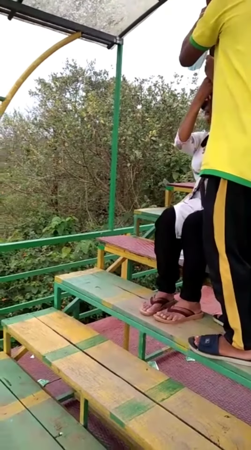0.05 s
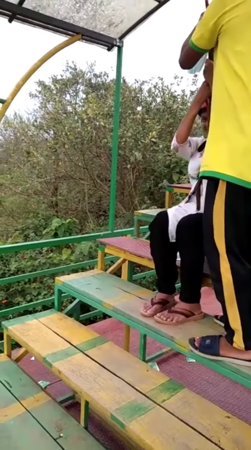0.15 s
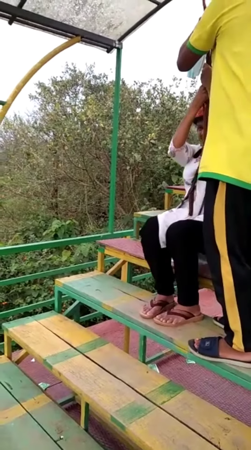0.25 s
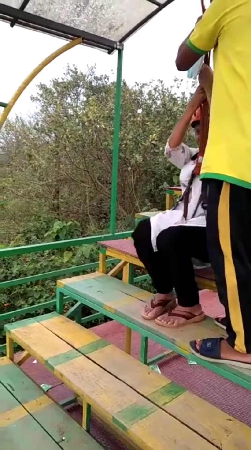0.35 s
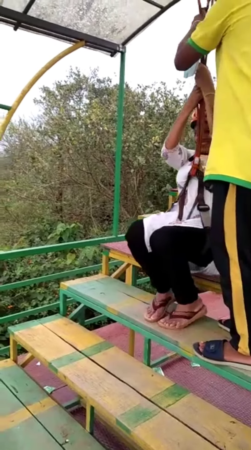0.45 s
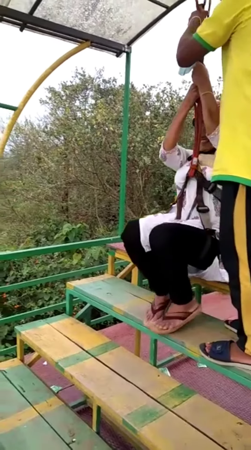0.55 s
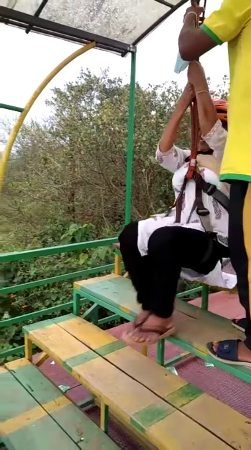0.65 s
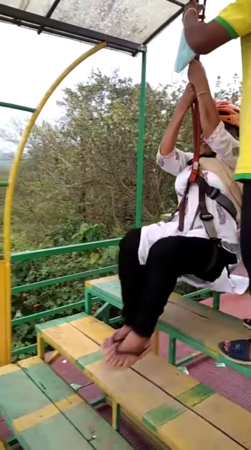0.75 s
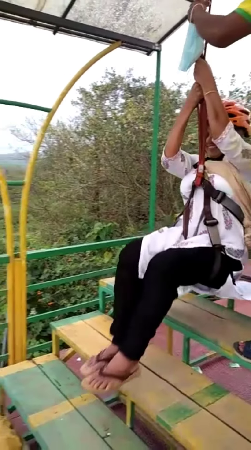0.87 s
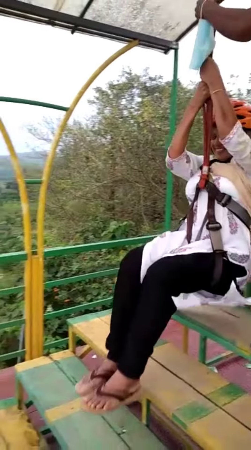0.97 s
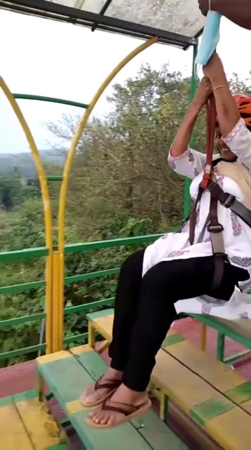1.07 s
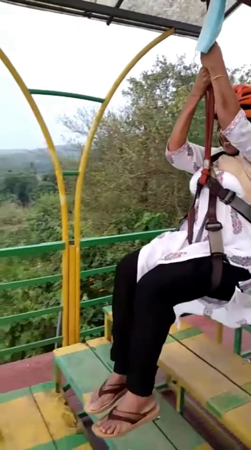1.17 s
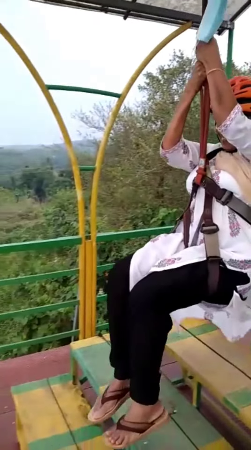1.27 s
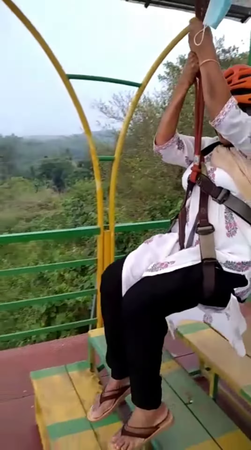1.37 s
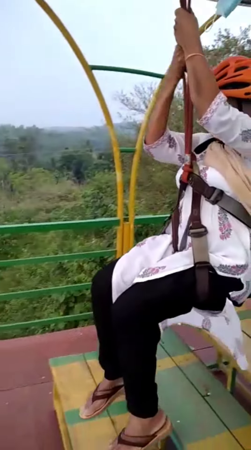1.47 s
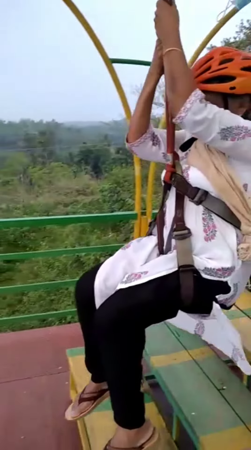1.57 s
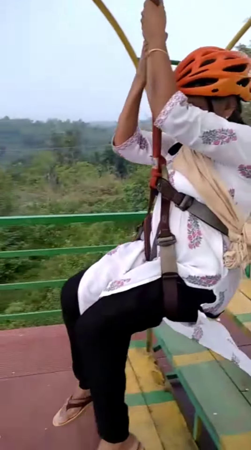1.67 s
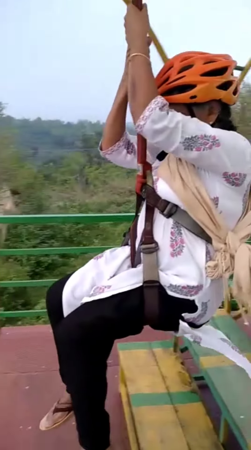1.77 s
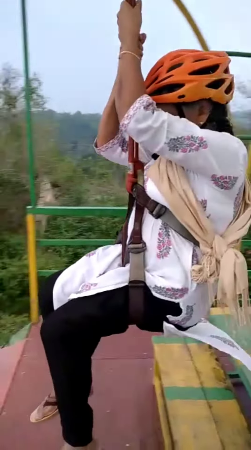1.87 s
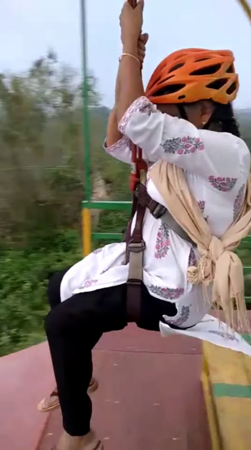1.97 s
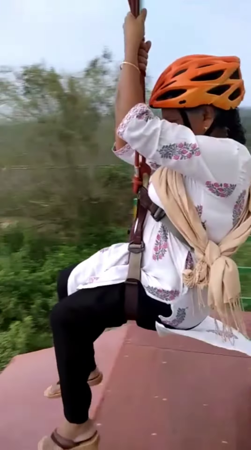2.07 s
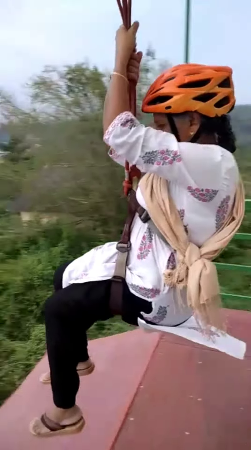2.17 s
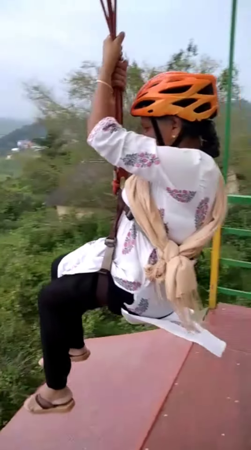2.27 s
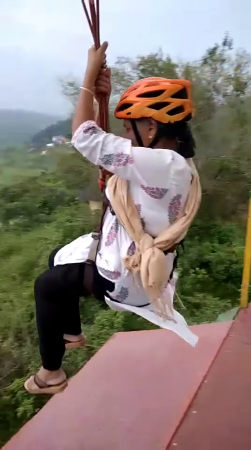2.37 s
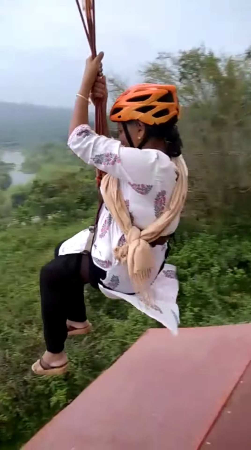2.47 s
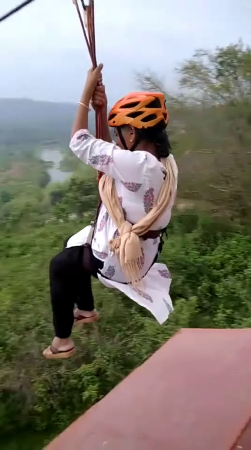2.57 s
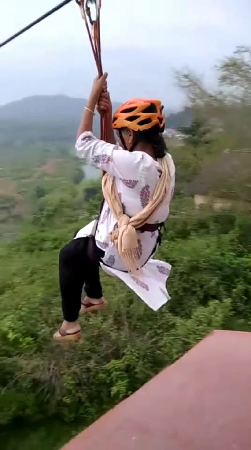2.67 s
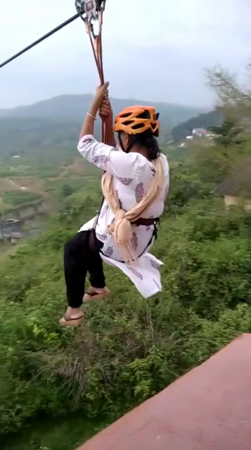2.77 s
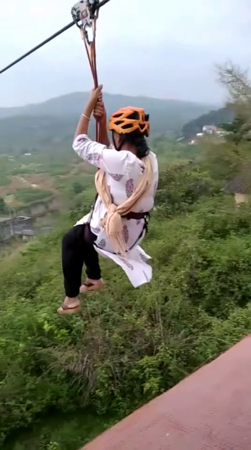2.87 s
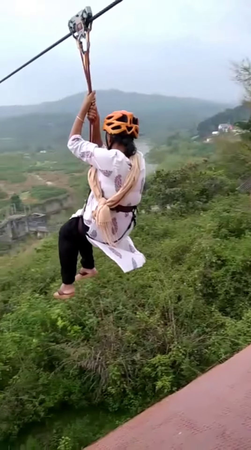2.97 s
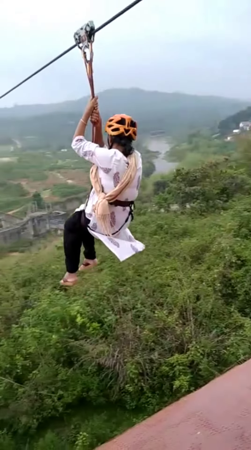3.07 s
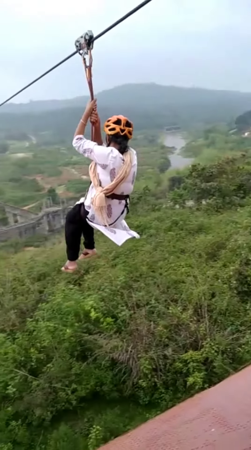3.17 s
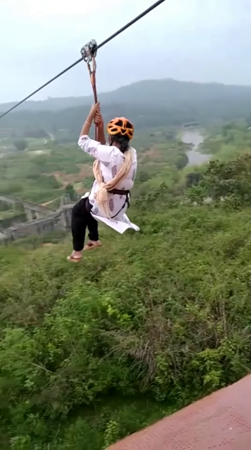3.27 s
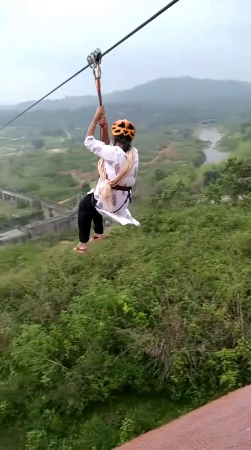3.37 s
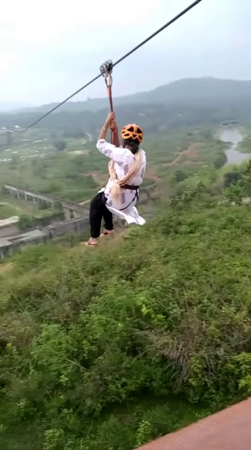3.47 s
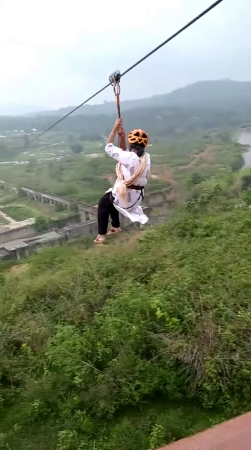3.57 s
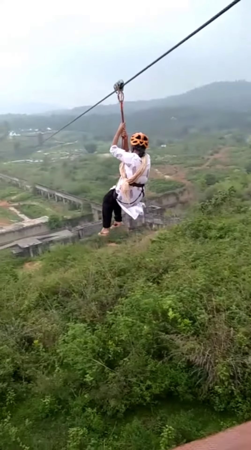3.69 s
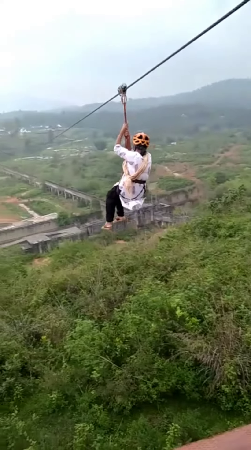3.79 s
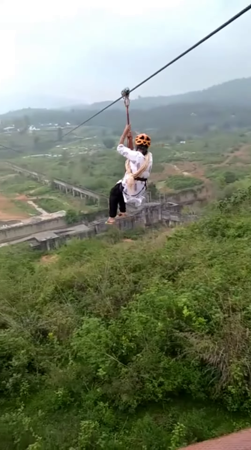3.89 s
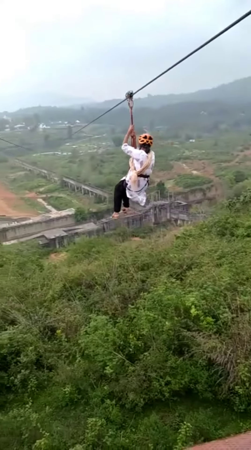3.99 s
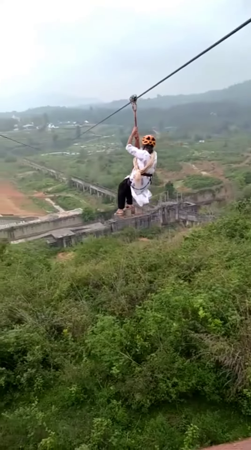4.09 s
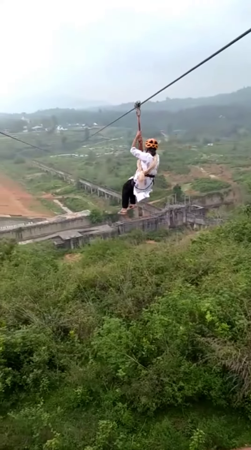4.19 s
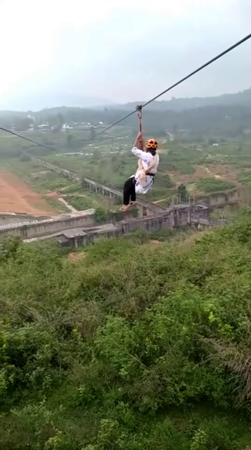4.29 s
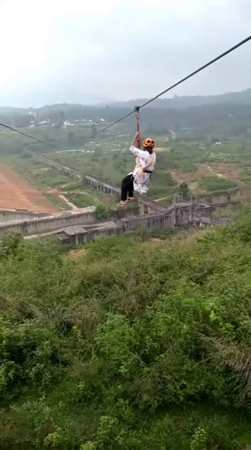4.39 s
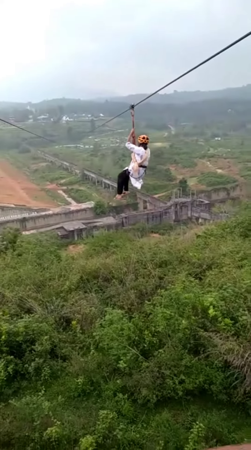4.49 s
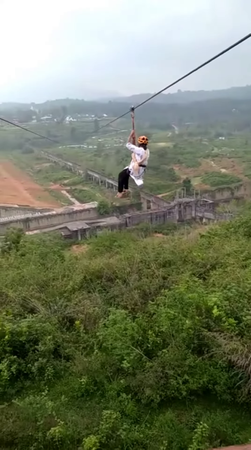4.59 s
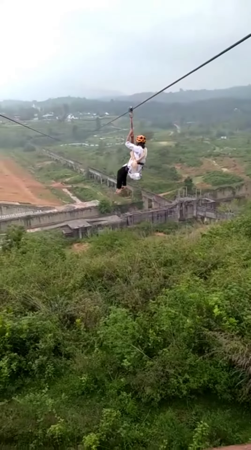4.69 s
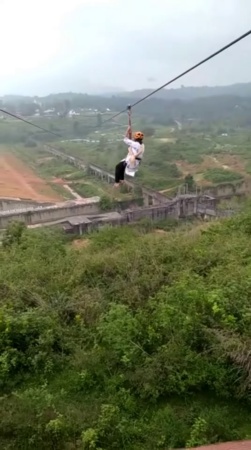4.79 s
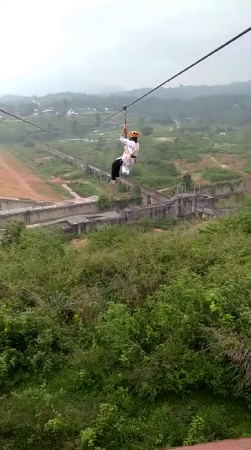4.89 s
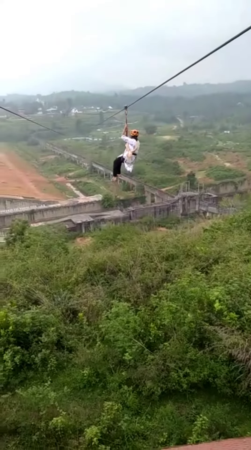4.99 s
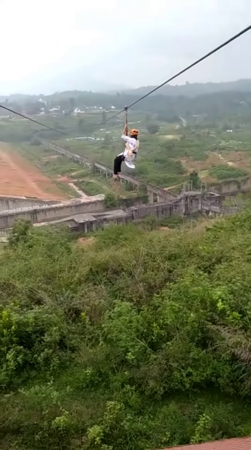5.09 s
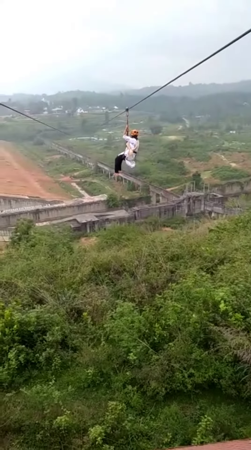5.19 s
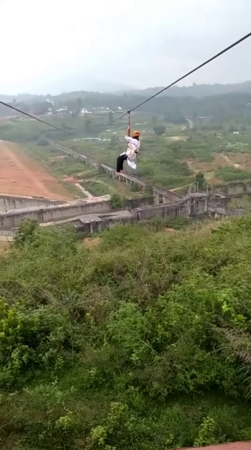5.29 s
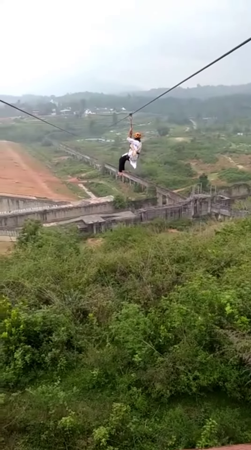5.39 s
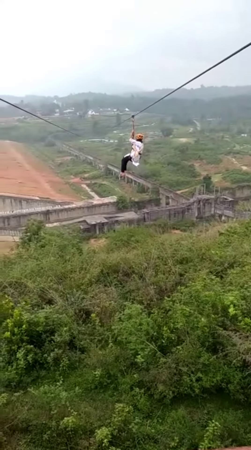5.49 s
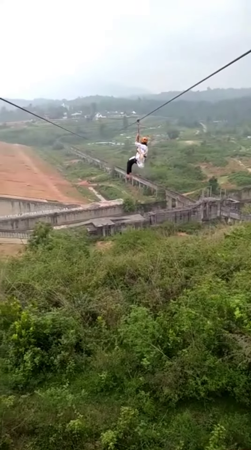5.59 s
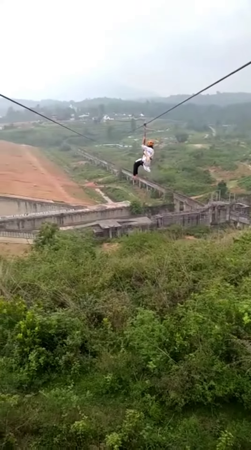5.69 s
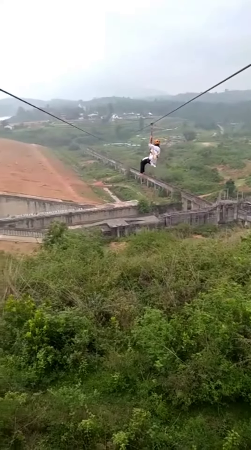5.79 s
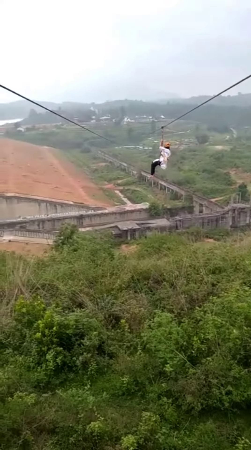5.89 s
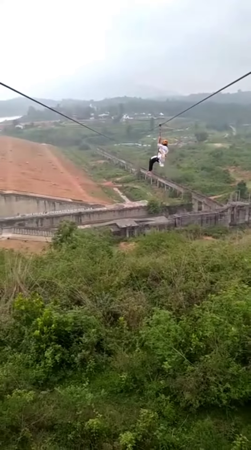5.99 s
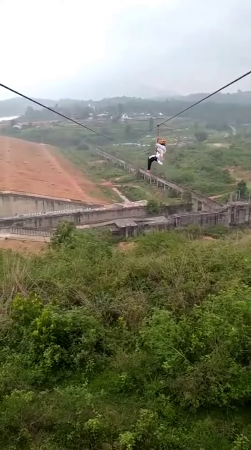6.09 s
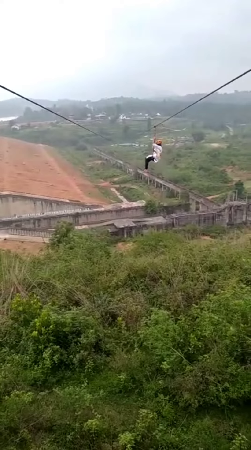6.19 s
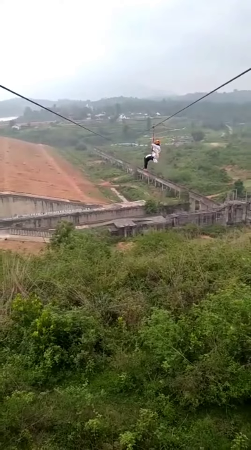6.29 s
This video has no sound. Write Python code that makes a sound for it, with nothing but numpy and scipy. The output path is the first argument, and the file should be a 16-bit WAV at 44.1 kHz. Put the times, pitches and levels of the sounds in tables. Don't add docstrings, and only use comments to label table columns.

```python
import sys
import numpy as np
from scipy import signal
from scipy.fft import rfft, irfft, next_fast_len
from scipy.io import wavfile
from scipy.ndimage import uniform_filter1d, map_coordinates

SR = 44100
rng = np.random.default_rng(int(sys.argv[2]) if len(sys.argv) > 2 else 0)


def wav_record(signal):
    frames = np.transpose(np.atleast_2d(signal))
    bounded = np.clip(frames, -1, 1)
    quanta = np.round(bounded * 32767).astype(np.int16)
    wavfile.write(sys.argv[1], SR, quanta)


def makeup_ratio(level_db):
    decades = np.asarray(level_db, float) / 20
    return 10 ** decades


N = 279831

# time_s, level_db
CONTACT_FORCE = [(0.36, -95), (0.45, -71), (0.5, -65), (0.59, -57.5), (0.75, -57.5), (0.9, -61),
                 (1.04, -49.5), (1.21, -43.5), (1.49, -44), (1.85, -43), (1.9, -46), (1.97, -41.5),
                 (2.05, -41), (2.37, -42), (2.43, -39.5), (2.5, -39.5), (2.91, -40.5), (3.9, -39),
                 (4.34, -38.5), (4.7, -39), (4.94, -40), (5.21, -39), (5.76, -40.5), (6.35, -39.5)]
# time_s, rate_per_s, throbbing_share (0-1), share_through_cable (0-1)
STRAND_PASSING = [
    (0.4, 50, 0.5, 0.5),
    (1.1, 102, 0.47, 0.3),
    (1.16, 108, 0.32, 0.38),
    (2.0, 78, 0.22, 0.02),
    (2.7, 172, 0, 0.83),
    (3.5, 120, 0.03, 0.99),
    (4.6, 150, 0.1, 0.95),
    (6.35, 140, 0, 0.95),
]
# time_s, peak_db
STRAND_TICKS = [(0.3703, -56), (0.388, -34), (0.4257, -39.5), (0.4565, -28), (0.463, -36), (0.4796, -25.5),
                (0.5023, -31), (0.521, -23), (0.5432, -24), (0.551, -28.5), (0.561, -33), (0.579, -29),
                (0.5935, -21.5), (0.612, -31), (0.6263, -25), (0.645, -43), (0.6577, -21.5), (0.6744, -27),
                (0.6894, -28), (0.7044, -23), (0.7184, -25), (0.734, -28), (0.747, -28), (0.762, -26),
                (0.7751, -22.5), (0.7894, -22), (0.802, -22), (0.818, -21.5), (0.824, -24), (0.8317, -32),
                (0.838, -20), (0.849, -28), (0.864, -29), (0.880, -26), (0.8963, -30), (0.9146, -25),
                (0.933, -27), (0.9527, -28), (0.9595, -23), (0.969, -24), (0.9844, -23), (0.999, -27),
                (1.014, -23.5), (1.0281, -23), (1.0403, -29), (1.0524, -17.5), (1.065, -21), (1.0767, -14),
                (1.0894, -17), (1.1, -20), (1.115, -21), (1.128, -28), (1.1887, -19)]
# time_s, peak_db, brightness_db
ROUGH_SPOTS = [(1.3552, -33, 3.5), (1.4071, -43, -3), (1.469, -25, -1.5), (1.6067, -34, 7.5),
               (1.709, -39, 3), (1.7633, -32, 4), (1.8845, -32, 2), (2.0555, -38, 0), (2.112, -43, -3),
               (2.1858, -39, -2), (2.212, -33, 0), (2.2816, -25, -1.5), (2.33, -26, 3), (2.36, -27, 1),
               (2.4961, -35.5, 11.5), (2.5495, -14.5, -8.5), (2.5994, -25, 3.5), (2.6425, -23, -0.5),
               (2.7096, -30, 0), (2.7835, -40, -2), (2.8559, -19, -3), (2.9682, -16, -8), (3.2894, -14, -9),
               (3.3287, -20.5, -8), (3.5562, -24, 0.5), (3.6294, -19, -8), (3.65, -38, -9),
               (3.9772, -24.5, 1), (4.2012, -34, 0), (4.2394, -12.5, -9.5), (4.39, -30, -6), (4.6, -30, -4),
               (4.715, -21, -4.5), (4.83, -33, -6), (4.894, -20, -9), (5.083, -17, -2.5), (5.1696, -14, -8),
               (5.185, -22, -4), (5.1974, -28, -8), (5.2713, -26, -2), (5.3494, -16.5, -7),
               (5.466, -19.5, -0.5), (5.5194, -15, -10), (5.72, -14.5, -10), (5.925, -19.5, -0.5),
               (5.9492, -17, -8), (6.0294, -27.5, 5.5), (6.062, -26, 2), (6.328, -26, -4)]
# time_s, level_db
PLATE_PRESSURE = [(0.7, -3), (1.0, -2), (1.3, -6), (1.45, 1), (1.6, 0), (1.72, 0.5), (1.83, 3), (1.92, 1.5),
                  (2.05, 0), (2.2, 1), (2.45, -0.5)]
# time_s, level_db
HUM_LEVEL = [(5.25, -103), (5.46, -75), (5.6, -76), (5.74, -82), (5.82, -69), (5.95, -70), (6.1, -76),
             (6.35, -71)]
HUM_OVERTONES_DB = [-80, -83]

# frequency_hz, width_hz, level_db
FRAME_COLOUR = [(150, -36.5), (250, -21.5), (500, -27.5), (800, -11), (1100, -22.5), (1450, -7.5),
                (1650, -14.5), (2000, -53)]
FRAME_RESONANCES = [(382, 81, 13.5), (669, 47, 15), (947, 59, 9), (1584, 39, -4.5)]
PLATE_COLOUR = [(1500, -26), (1740, 3), (1950, -15), (2150, -6), (2400, -50)]
PLATE_RESONANCES = [(1916, 57, 21.5), (2022, 83, 22.5), (2087, 47, 17)]
SLACK_PLATE_COLOUR = [(1200, -43), (1600, -9.5), (2000, -8), (2300, -6), (3000, -23.5)]
WHEEL_COLOUR = [(1410, -33), (2400, 5), (2790, 4), (3130, 6), (3430, 7.5), (5230, -4), (7000, -27),
                (9100, -27), (15400, -120)]
WHEEL_RESONANCES = [(2950, 140, 3.4), (3393, 250, 8.6), (5700, 49, 2.8)]
AXLE_COLOUR = [(3240, -29), (5500, -10), (7390, -2.5), (8200, 0.5), (8630, -1), (9500, -5), (14300, -13.5)]
AXLE_RESONANCES = [(8420, 160, 5)]
CABLE_COLOUR = [(470, -89), (800, -18), (884, -13.5), (1320, -5), (1810, -2.5), (2270, -0.5), (4410, 1.5),
                (5190, 2), (7000, -2.5), (9100, 2), (15400, -120)]
CABLE_RESONANCES = [(914, 77, 2.3), (1723, 110, 4.8), (2515, 23, 1.4), (2881, 150, 9.1), (3810, 6.2, 2.7),
                    (4160, 19, 5), (4770, 56, 1.8), (5800, 110, 1.9)]
WIRE_COLOUR = [(3240, -33), (5500, 0.5), (6320, -1), (7390, -0.5), (8600, 6.5), (10900, -13), (12500, -21),
               (14300, -97)]
WIRE_RESONANCES = [(6650, 50, -14), (7440, 32, 2), (8630, 116, 3.5), (8530, 480, 5.5)]
TICK_COLOUR = [(1120, -15.5), (1900, -10), (2570, 3), (3050, 3), (3790, 2), (4130, 1), (4730, -2.5),
               (5880, 2), (7710, 2), (12100, -14.5), (14300, -22)]
# frequency_hz, width_hz, level_under_hiss_db, start_s
SINGING_MODES = [(1303, 69, -21, 3.3), (2328, 85, -11.5, 2.3), (2640, 19, -15, 3.2), (2977, 17, -12, 3.64),
                 (3328, 89, -11, 2.35), (3840, 39, -17, 4.4), (4204, 31, -15.5, 2.4), (4412, 65, -7, 4.17),
                 (5500, 69, -6, 4.6), (5750, 95, -15, 6.6), (6600, 44, -13, 4.4), (7280, 69, -6.5, 5.36),
                 (7450, 45, -8.5, 4.25), (8700, 63, -15, 4.2)]

# time_s, peak_db, hardness_db_per_octave
FOOT_KNOCKS = [
    (0.557, -69, 11.5),
    (2.079, -50, 4),
    (2.119, -51, -11),
    (2.648, -55, -11),
    (3.849, -53, -18),
    (3.860, -42, 3.5),
    (3.877, -45, 5),
    (3.897, -51.5, -11),
]
# frequency_hz, level_db, t60_s
DECK_MODES = [(98, -32, .1), (159, 11.5, 0.1), (215, 7, 0.15), (297, -1, .07), (506, 9, 0.1),
              (630, 4, 0.059), (730, 3, 0.099), (860, 5.5, 0.16)]
# time_s, pitch_hz, level_db
BIRD_GLIDE = [
    (0.3, 1440, -93),
    (0.334, 1500, -62.5),
    (0.402, 1410, -71.5),
    (0.452, 1456, -64),
    (0.528, 1654, -64.5),
    (0.564, 1694, -68),
    (0.614, 1620, -60.5),
    (0.674, 1340, -71),
    (0.69, 1290, -72),
]
# frequency_hz, density_db (per Hz)
AIR_COLOUR = [(88, -8), (150, -29), (242, -19), (374, -25), (453, -13.5), (518, -9.5), (663, -11.5),
              (744, -9.5), (2990, -15), (9210, -22), (14300, -24)]
# frequency_hz, width_hz, level_db
INSECT_BANDS = [(5400, 480, 4), (9200, 900, 17.5)]
# time_s, level_db
BREEZE_LEVEL = [(0, -65.5), (.12, -62.5), (.25, -68.5), (.4, -67.5), (6.35, -65)]
# frequency_hz, density_db (per Hz)
WIND_COLOUR = [(8.8, -44), (15, 6), (40, -3.5), (116, -7), (157, -8.5), (204, -14), (265, -11), (350, -15),
               (460, -13), (770, -120)]
# time_s, peak_db
WIND_PUFFS = [(.14, -70.5), (.6, -69), (1.702, -87), (2.14, -64), (2.42, -86), (3.303, -81), (3.55, -91),
              (3.921, -63), (4.3, -71), (4.95, -66.5), (5.6, -81), (6.151, -98)]
# frequency_hz, share (0-1)
PORT_LIKENESS = [(100, .93), (300, .9), (800, .8), (2000, .75), (4000, .75), (8000, .65), (14000, .65)]

NEAR_LAGS, CABLE_LAGS, WIRE_LAGS = (21, 66), (12, 21), (12, 46)
ROOF_EDGE_S = 2.326
TIME_S = np.arange(N) / SR


def trolley():
    frame_db, plate_db, hiss_db, fizz_db, pan_db = levels()
    per_s, throb_share, away = in_time(STRAND_PASSING)
    near, far = np.sqrt(np.clip([1 - away, away], 0, 1))
    unevenness = makeup_ratio(0.82 * drift(4.0) + 0.077 * drift(25))
    load = during(CONTACT_FORCE, 0.056) * throb(per_s, np.clip(throb_share, 0, 1)) * unevenness
    ticks = kicks(STRAND_TICKS, 0.00059, 0.022)
    rumble = grit(0.26)

    frame_force = rumble * load * makeup_ratio(frame_db + 1.0 * drift(21.0))
    frame = heard(frame_force, FRAME_COLOUR, FRAME_RESONANCES, NEAR_LAGS, echo=0.081)
    plate = plates(rumble, load * makeup_ratio(plate_db), ticks)

    hiss_jolts = makeup_ratio(-5.0) * kicks(ROUGH_SPOTS, 0.0042, 0.076, -0.23)
    fizz_jolts = makeup_ratio(5.5) * kicks(ROUGH_SPOTS, 0.00056, 0.076, 1.0)
    hiss = grit(2.1) * np.hypot(load * makeup_ratio(hiss_db + 0.041 * drift(2.8)), hiss_jolts)
    fizz = grit(3.8) * np.hypot(load * makeup_ratio(fizz_db + 0.16 * drift(25)), fizz_jolts)

    close = heard(near * hiss, WHEEL_COLOUR, WHEEL_RESONANCES, NEAR_LAGS, echo=1.0)
    close += heard(near * fizz, AXLE_COLOUR, AXLE_RESONANCES, NEAR_LAGS, echo=0.36)
    cable = heard(far * hiss, CABLE_COLOUR, CABLE_RESONANCES, CABLE_LAGS, echo=0.028)
    wires = heard(far * fizz, WIRE_COLOUR, WIRE_RESONANCES, WIRE_LAGS, echo=0.17, alike=0.26)
    steel = strand_ticks(ticks) + singing(load * makeup_ratio(hiss_db)) + swung(close) + cable
    steel += wires * makeup_ratio([[0.6], [-0.6]])
    return swung(frame) + plate * makeup_ratio([[1.5], [-1.5]]) + steel * makeup_ratio([pan_db / 2, -pan_db / 2])


def levels():
    (force_db,) = in_time(CONTACT_FORCE)
    frame_gone, plate_gone = gone(1.0), gone(0.39)
    frame_db = force_db - 10.5 - 23 * frame_gone
    early_plate_db = 0.5 * np.maximum(1.93 - TIME_S, 0)
    plate_db = force_db - 2.5 - 6 * plate_gone + early_plate_db
    speed_db = 0.78 * np.maximum(TIME_S - ROOF_EDGE_S, 0)
    fizz_db = force_db + 1.5 - 2.5 * plate_gone + speed_db
    pan_db = -1.35 + 4 * frame_gone
    return frame_db, plate_db, force_db, fizz_db, pan_db


def gone(fade_s):
    return 1 - np.exp(-np.maximum(TIME_S - ROOF_EDGE_S, 0) / fade_s)


def throb(per_s, share):
    turns = np.cumsum(per_s * makeup_ratio(1.2 * drift(25))) / SR
    strand_heights = makeup_ratio(6.5 * rng.standard_normal(4000))
    height = strand_heights[turns.astype(int)]
    return 1 - share + share * rms_one(height * np.exp(-2.5 * (turns % 1)))


def plates(rumble, force, ticks):
    ring_ends_s, ring_fade_s = 2.29, 0.042
    pressed = force * makeup_ratio(in_time(PLATE_PRESSURE)[0] + 1.3 * drift(17))
    knocked = rumble * np.hypot(pressed, makeup_ratio(-19) * ticks)
    ringing = np.exp(-np.maximum(TIME_S - ring_ends_s, 0) / ring_fade_s)
    loaded = heard(np.sqrt(ringing) * knocked, PLATE_COLOUR, PLATE_RESONANCES, NEAR_LAGS, echo=0.69, alike=1.7)
    slack = heard(np.sqrt(1 - ringing) * knocked, SLACK_PLATE_COLOUR, (), NEAR_LAGS, echo=0.22)
    return loaded + slack


def strand_ticks(ticks):
    snaps = makeup_ratio(-4) * kicks(STRAND_TICKS, 0.0001, 0.0018)
    return heard(grit(1.4) * (ticks + snaps), TICK_COLOUR, (), NEAR_LAGS, echo=0.81, alike=0.32)


def singing(force):
    out = 0
    for hz, width, db, from_s in SINGING_MODES:
        r = np.exp(-np.pi * width / SR)
        poles = [1, -2 * r * np.cos(2 * np.pi * hz / SR), r * r]
        both, apart = rms_one(signal.lfilter([1, 0, -1], poles, rng.standard_normal((2, N))))
        ring = np.array([0.88 * np.roll(both, CABLE_LAGS[0]) + 0.95 * apart, 0.95 * both])
        onset = np.clip((TIME_S - from_s) / 0.7, 0, 1)
        out = out + makeup_ratio(db + 1.0 * drift(5.4)) * onset * ring
    return out * force


def swung(pair):
    from_s, fade_s, path_samples = 2.25, 0.25, 8.23
    ahead = path_samples * (1 - np.exp(-np.maximum(TIME_S - from_s, 0) / fade_s))
    left = map_coordinates(pair[0], [np.arange(N) + ahead], order=3, mode="nearest")
    return np.array([left, pair[1]])


def hum():
    from_s, start_hz, rise_hz_per_s = 5.3, 196, 51
    hz = start_hz + rise_hz_per_s * (TIME_S - from_s)
    phase = 2 * np.pi * np.cumsum(hz) / SR
    partials = 0
    for k, db in enumerate(in_time(HUM_LEVEL) + HUM_OVERTONES_DB):
        partials = partials + makeup_ratio(db + 1.0 * drift(7)) * np.sin((k + 1) * phase)
    return during(HUM_LEVEL, 0.29) * np.sqrt(2) * partials


def knocks():
    times_s, peak_db, hardness = np.transpose(FOOT_KNOCKS)
    at = [round(s * SR) for s in times_s]
    out = np.zeros(N)
    for hz, level_db, t60 in DECK_MODES:
        clicks = np.full(N, 1e-18)
        clicks[at] = makeup_ratio(peak_db + level_db - 19.0 + hardness * np.log2(hz / 250))
        r, w = makeup_ratio(-60 / (t60 * SR)), 2 * np.pi * hz / SR
        out += signal.lfilter([0, np.sin(w)], [1, -2 * r * np.cos(w), r * r], clicks)
    out = signal.lfilter([.15], [1, -.85], out)
    out = signal.sosfilt(signal.butter(2, 80, "high", fs=SR, output="sos"), out)
    return np.array([out, np.roll(out, 14)])


def bird():
    pitch_hz, level_db = in_time(BIRD_GLIDE)
    phase = 2 * np.pi * np.cumsum(uniform_filter1d(pitch_hz, size=900)) / SR
    call = during(BIRD_GLIDE, 0.018) * np.sqrt(2) * makeup_ratio(level_db) * np.sin(phase)

    def echo(delay_s, db):
        return makeup_ratio(db) * np.roll(call, round(delay_s * SR))

    left = makeup_ratio(8.0) * call + echo(0.0365, -4.0)
    right = echo(0.0001, -1.8) + echo(0.0089, -19)
    return np.array([left, right])


def outdoors():
    air_noise = rng.standard_normal((3, N))
    air = heard(air_noise, AIR_COLOUR, INSECT_BANDS, (-10, -25), echo=0.18, alike=0.29)
    wind_noise = rng.standard_normal((3, N)) * makeup_ratio(1.4 * drift(2.5))
    wind = heard(wind_noise, WIND_COLOUR, alike=1.0)
    return makeup_ratio(in_time(BREEZE_LEVEL)[0]) * air + gusts() * wind


def gusts():
    rise_s, fall_s = 0.054, 0.096
    strength = makeup_ratio(-71.5)
    for s, db in WIND_PUFFS:
        strength = strength + makeup_ratio(db) * np.exp(-np.maximum((s - TIME_S) / rise_s, (TIME_S - s) / fall_s))
    return strength


def grit(spread_db):
    sizes = makeup_ratio(spread_db * np.minimum(rng.exponential(1, N), 5))
    return rms_one(sizes * rng.standard_normal((3, N)))


def kicks(rows, rise_s, dying_s, tilt=0):
    out, t = np.zeros(N), np.arange(int(.15 * SR)) / SR
    shape = (1 - np.exp(-t / rise_s)) * makeup_ratio(-30 * t / max(dying_s, .001))
    for s, peak_db, *bright_db in rows:
        at = round(s * SR)
        out[at:][:len(t)] += makeup_ratio(peak_db - 16.5 + tilt * sum(bright_db)) * shape[:N - at]
    return out


def heard(streams, spectrum, modes=(), lags=(0, 0), echo=0, alike=0.67):
    size = next_fast_len(N + 4096, True)
    hz = np.maximum(np.arange(size // 2 + 1) * SR / size, 1)
    direct, left, right = rfft(streams, size) * body(spectrum, modes, hz)
    share = np.clip(alike * at_hz(PORT_LIKENESS, hz), 0, 1)
    first, second = np.exp(-2j * np.pi * np.outer(lags, hz) / SR)
    paths = (first + echo * second) / np.sqrt(1 + echo ** 2)
    common = np.sqrt(share) * direct * [paths, paths ** 0]
    scattered = np.sqrt(1 - share) * np.array([left, right])
    return irfft(common + scattered, size)[:, :N]


def body(spectrum, modes, hz):
    z, rings = np.exp(-2j * np.pi * hz / SR), 1
    for k, (mode_hz, width, db) in enumerate(modes):
        r = np.exp(-np.pi * width / SR)
        poles = 1 - 2 * r * np.cos(2 * np.pi * mode_hz / SR) * z + r * r * z * z
        rings = rings + makeup_ratio(db) * (-1) ** k * (1 - r * r) / 2 * (1 - z * z) / poles
    return rms_one(makeup_ratio(at_hz(spectrum, hz)) * np.abs(rings)) * np.exp(1j * np.angle(rings))


def drift(rate):
    r = np.exp(-40 * np.pi * rate / SR)
    slow = signal.lfilter([1], [1, -2 * r, r * r], rng.standard_normal(N // 20 + 4002))[4000:]
    return np.interp(np.arange(N) / 20, np.arange(len(slow)), rms_one(slow))


def in_time(rows):
    s, *columns = np.transpose(rows)
    return [np.interp(TIME_S, s, c) for c in columns]


def during(rows, fade_s):
    start, end = rows[0][0], rows[-1][0]
    return np.interp(TIME_S, [start - fade_s, start, end, end + fade_s], [0, 1, 1, 0])


def at_hz(points, hz):
    point_hz, value = np.transpose(points)
    return np.interp(np.log(hz), np.log(point_hz), value)


def rms_one(x):
    return x / np.sqrt(np.mean(x ** 2) + 1e-20)


def scene():
    return trolley() + hum() + knocks() + bird() + outdoors()


def top_cut(x):
    return signal.sosfilt(signal.butter(12, 14340, fs=SR, output="sos"), x)


def record(dry):
    return top_cut(dry)


dry = scene()
out = record(dry)
wav_record(out)
```